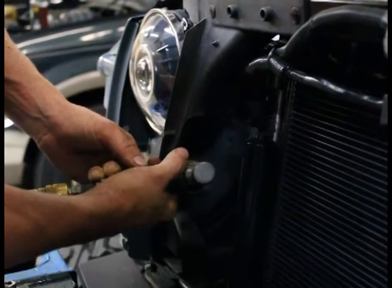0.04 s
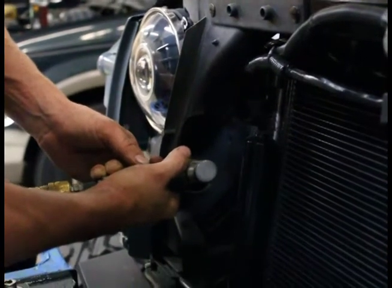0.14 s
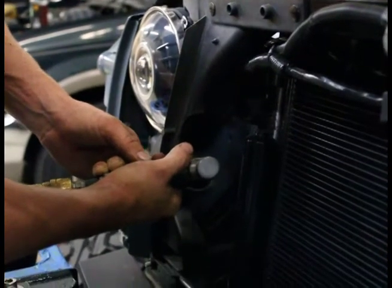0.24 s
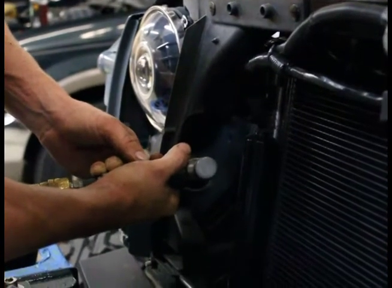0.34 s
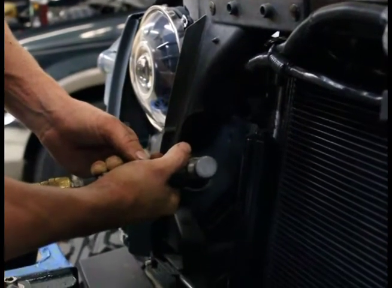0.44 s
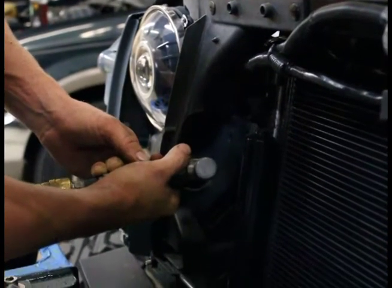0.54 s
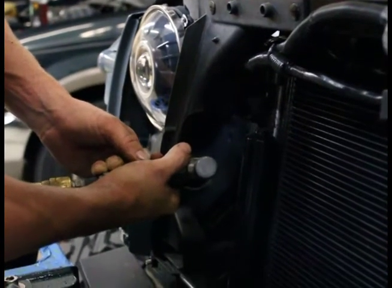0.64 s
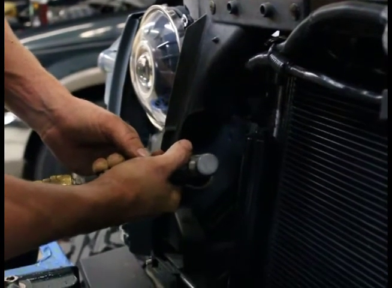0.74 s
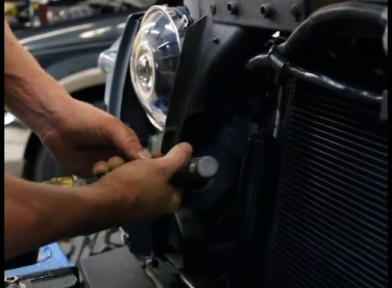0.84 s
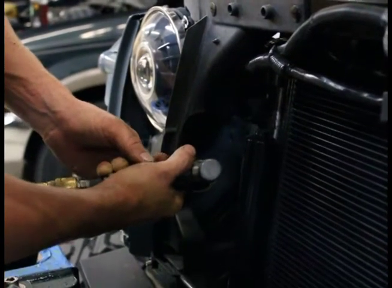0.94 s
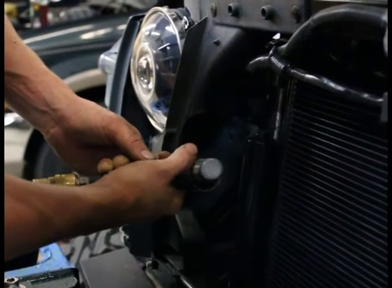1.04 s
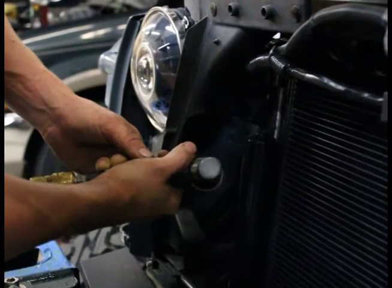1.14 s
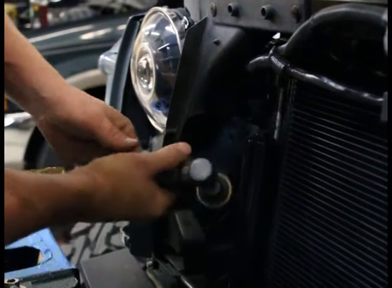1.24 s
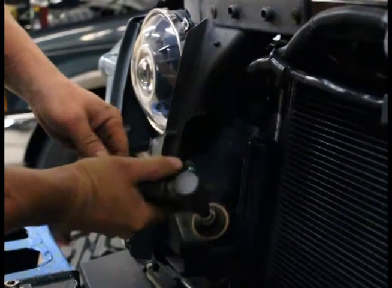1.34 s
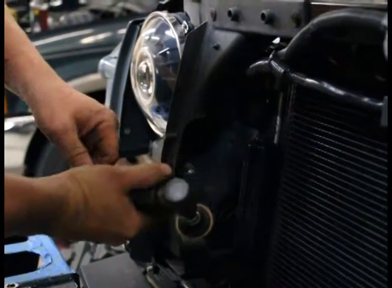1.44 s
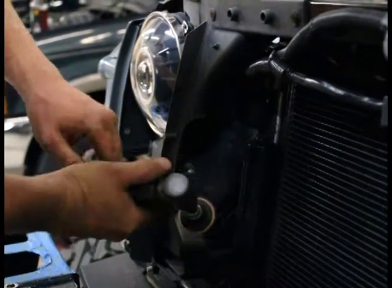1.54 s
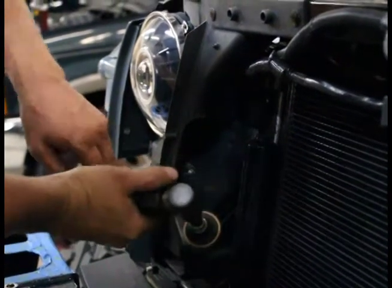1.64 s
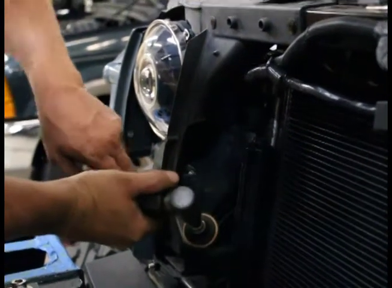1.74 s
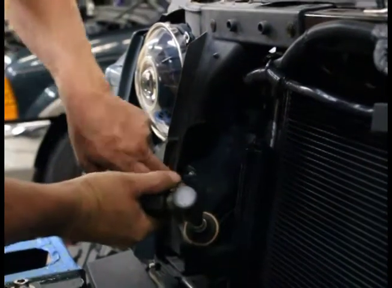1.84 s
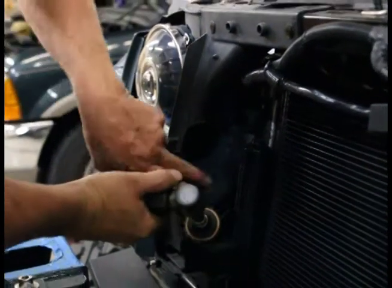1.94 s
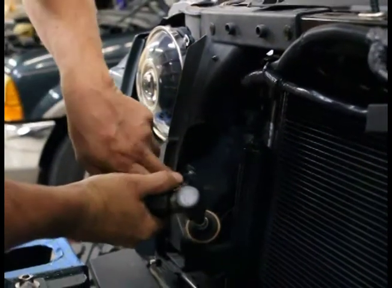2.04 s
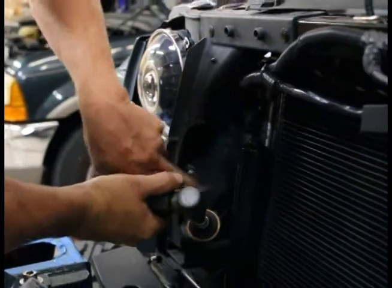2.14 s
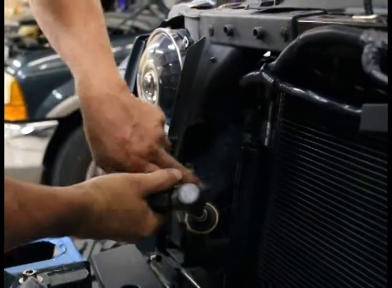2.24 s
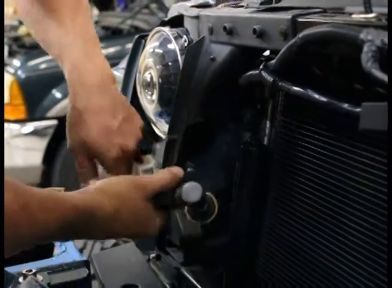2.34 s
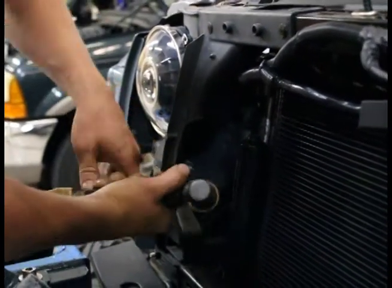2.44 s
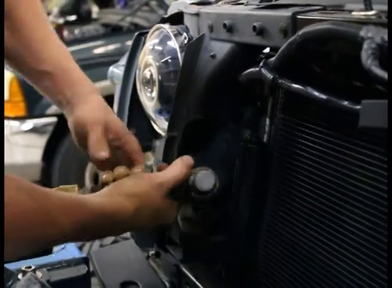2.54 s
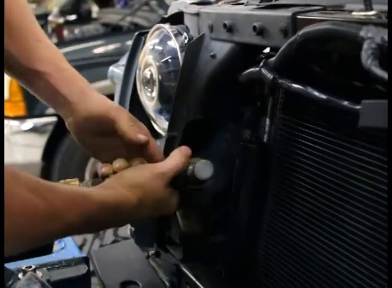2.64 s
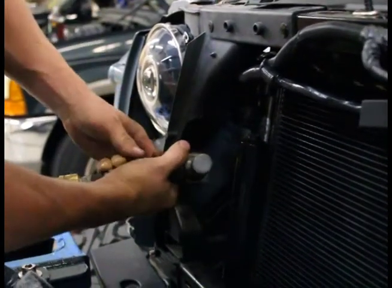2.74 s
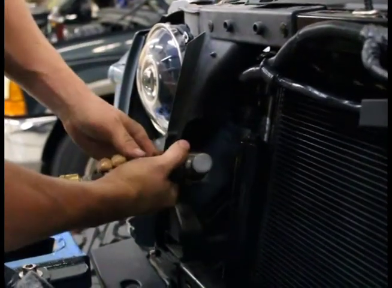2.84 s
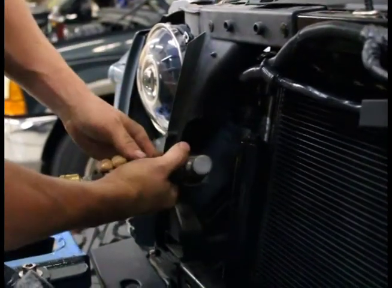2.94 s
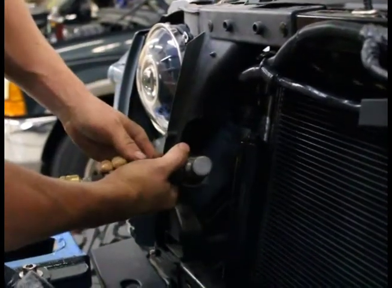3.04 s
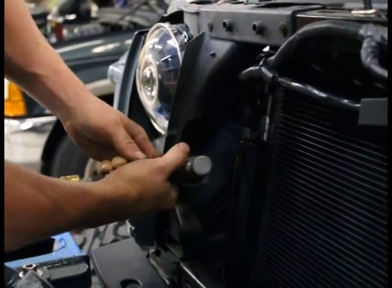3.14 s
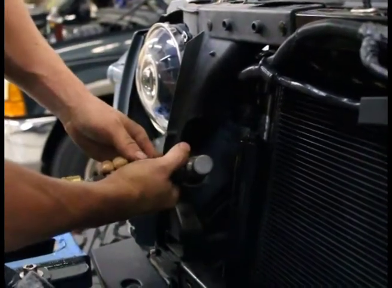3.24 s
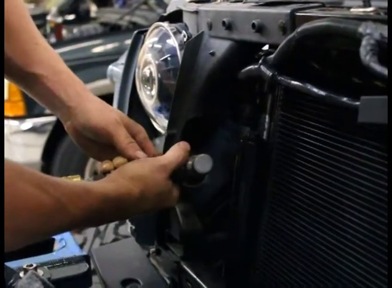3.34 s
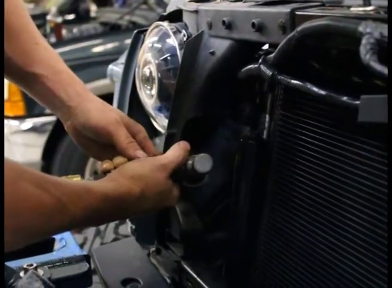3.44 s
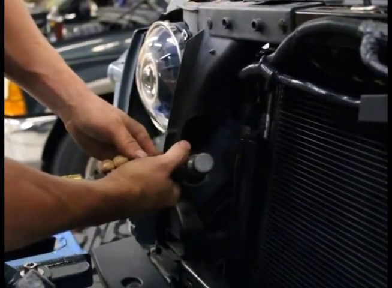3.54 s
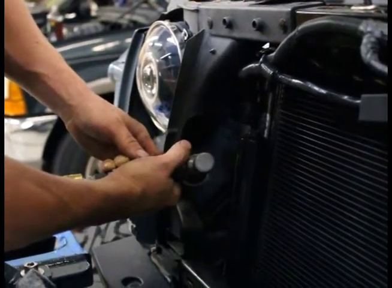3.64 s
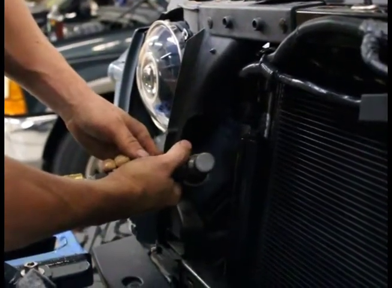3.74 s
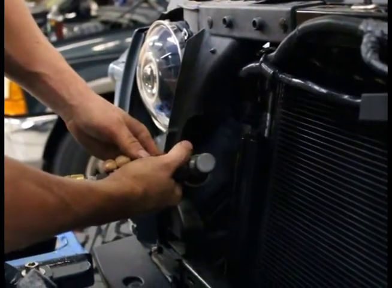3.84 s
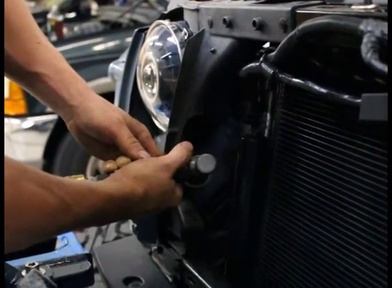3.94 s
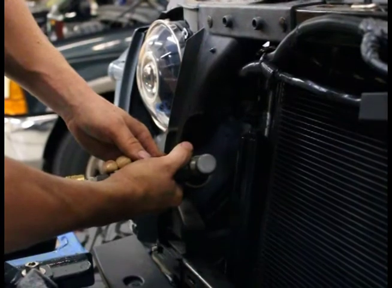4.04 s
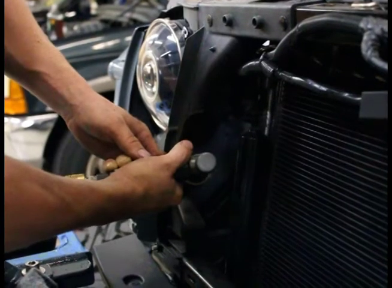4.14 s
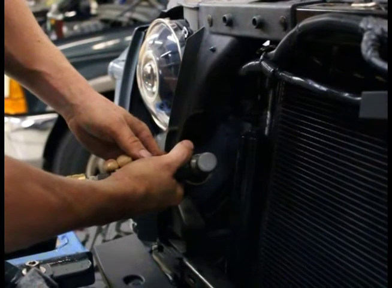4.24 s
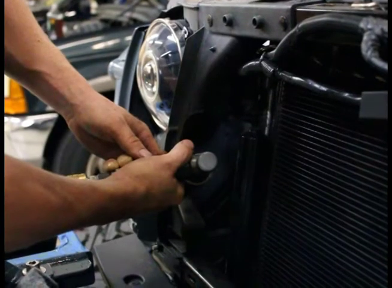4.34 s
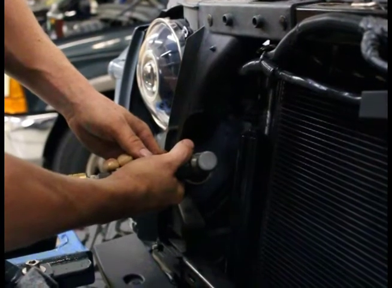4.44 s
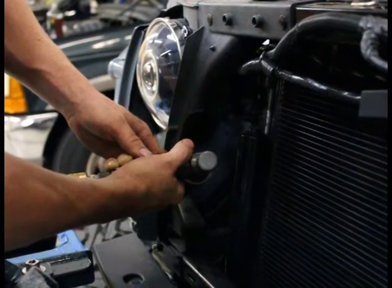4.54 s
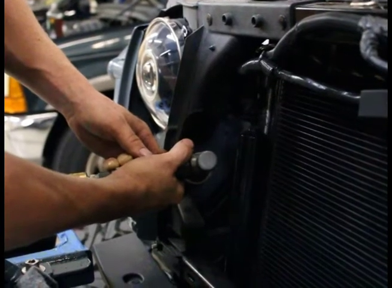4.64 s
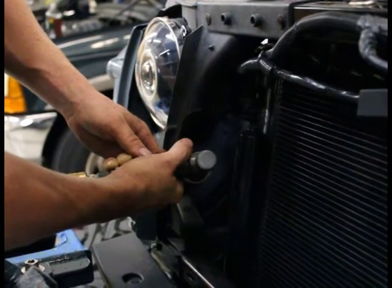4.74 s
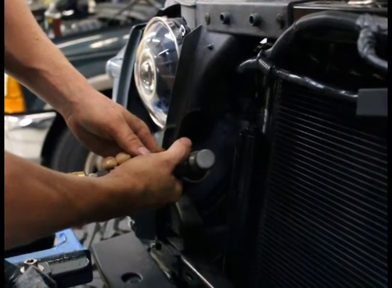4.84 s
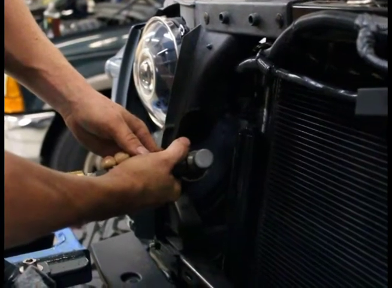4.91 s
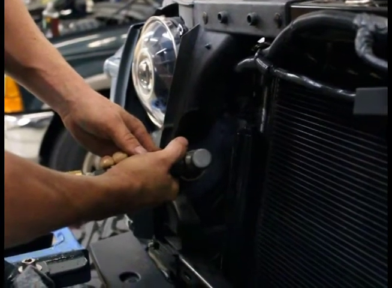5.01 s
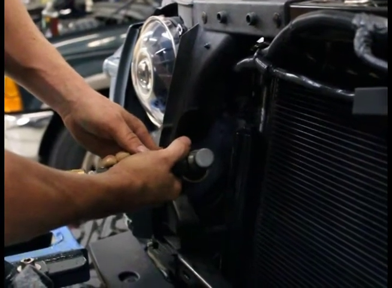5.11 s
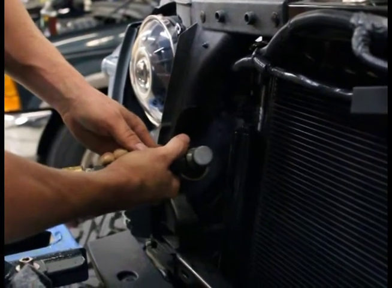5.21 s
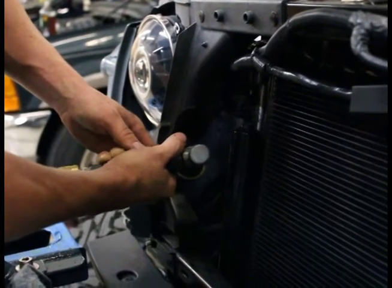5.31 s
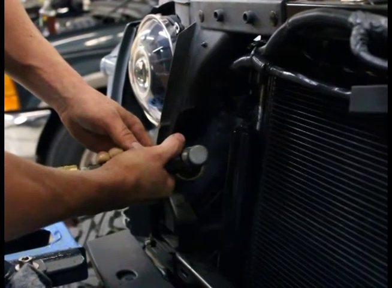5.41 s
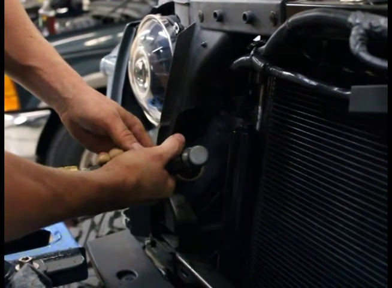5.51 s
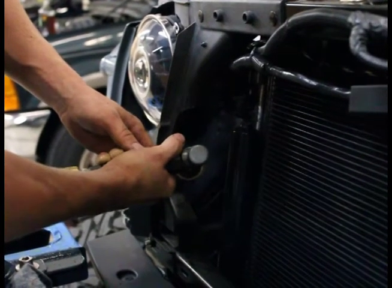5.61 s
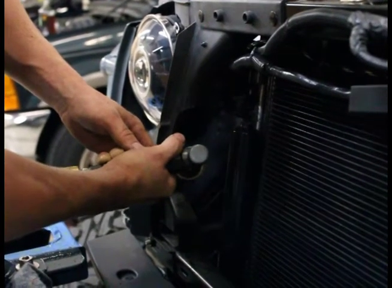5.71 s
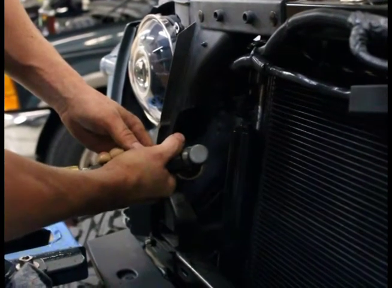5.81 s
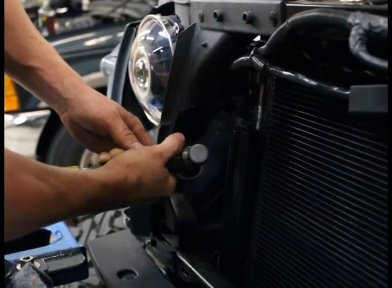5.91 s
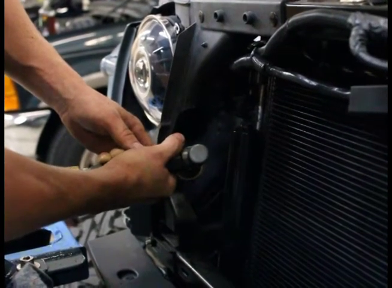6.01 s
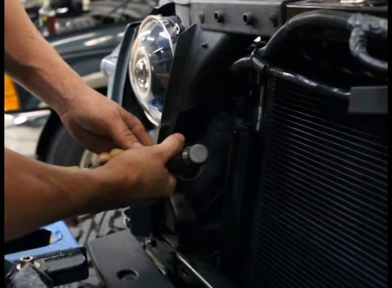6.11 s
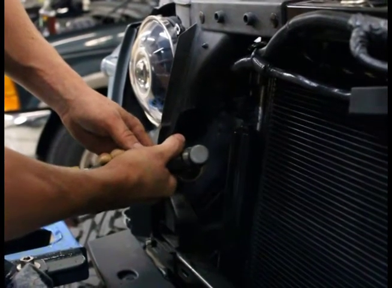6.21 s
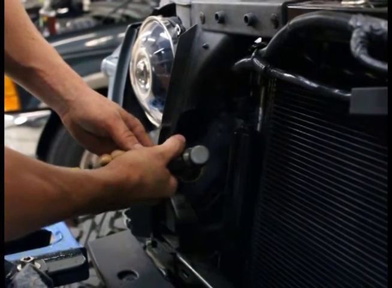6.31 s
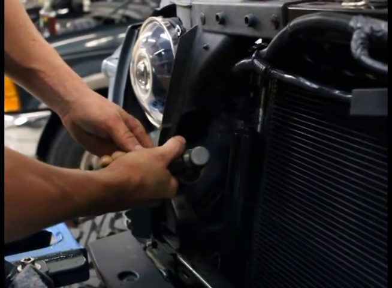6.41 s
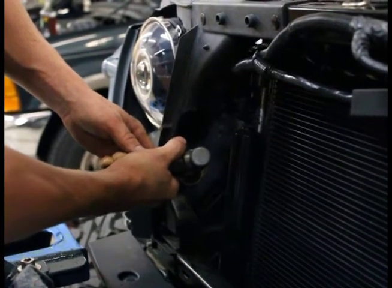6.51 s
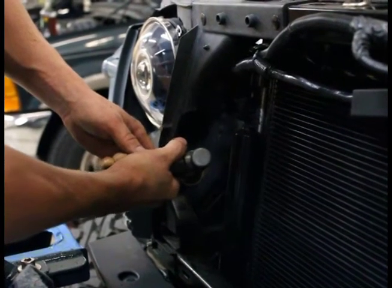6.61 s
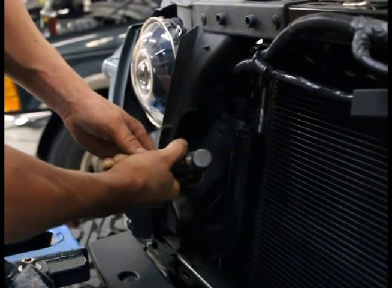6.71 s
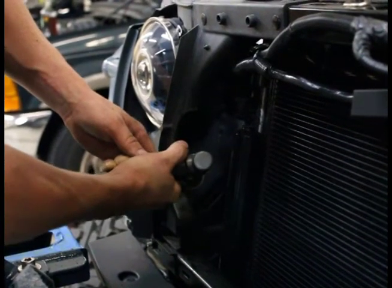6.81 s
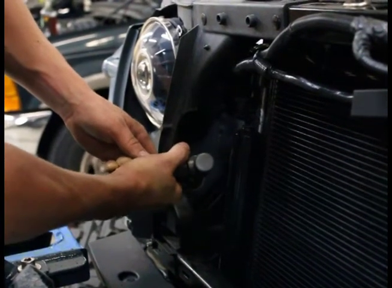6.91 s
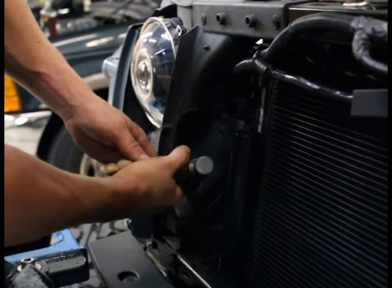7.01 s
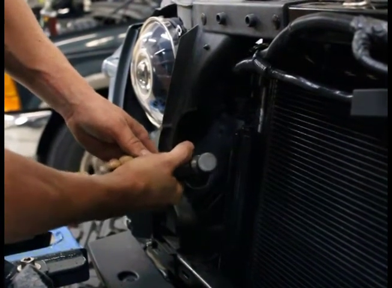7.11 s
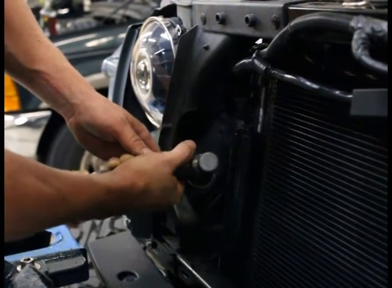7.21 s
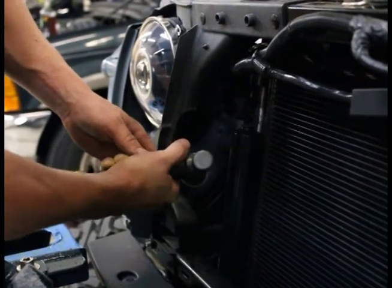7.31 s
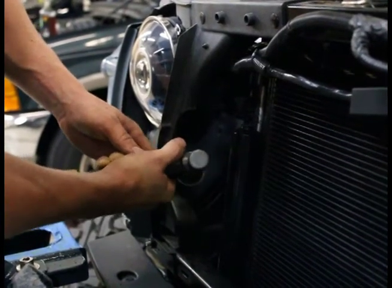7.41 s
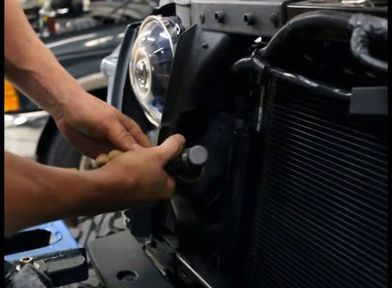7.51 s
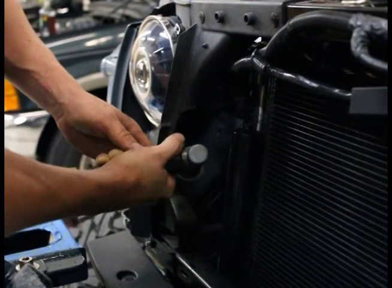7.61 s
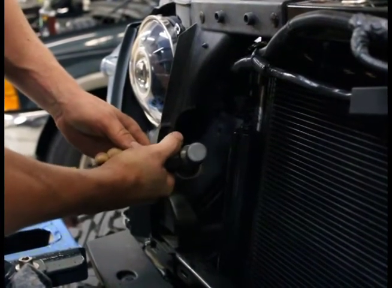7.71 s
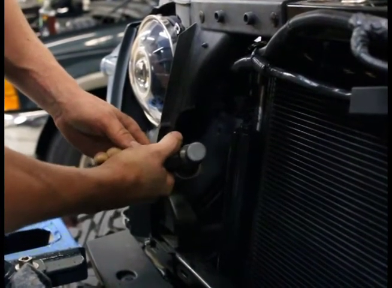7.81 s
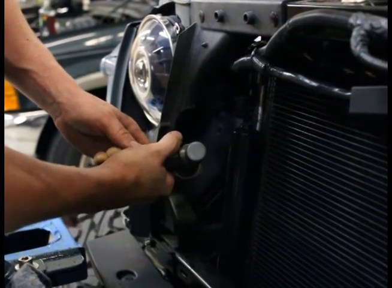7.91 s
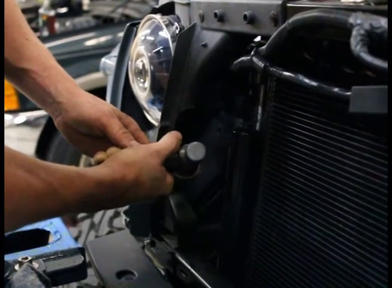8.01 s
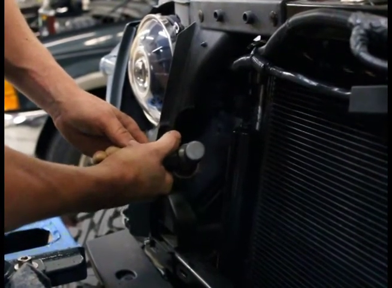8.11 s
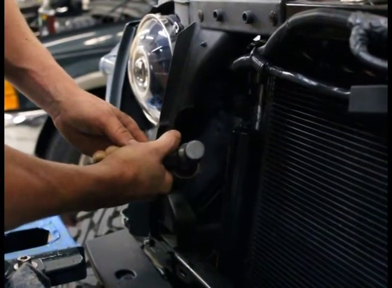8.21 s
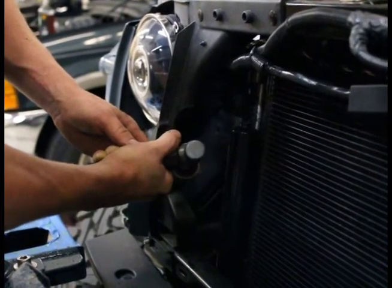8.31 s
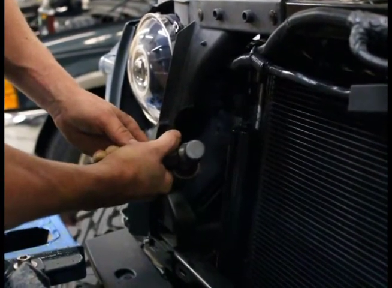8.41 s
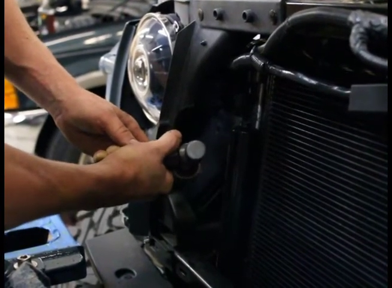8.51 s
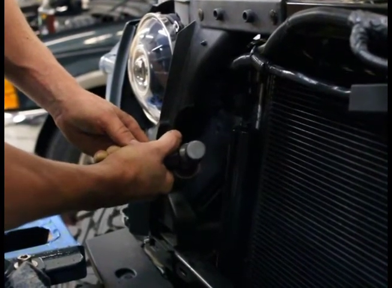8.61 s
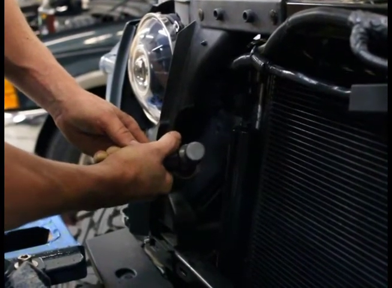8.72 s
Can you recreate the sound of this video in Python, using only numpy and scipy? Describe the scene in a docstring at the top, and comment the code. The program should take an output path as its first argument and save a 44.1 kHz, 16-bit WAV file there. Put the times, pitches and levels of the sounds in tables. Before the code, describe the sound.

Close pneumatic grinder screaming with bright air hiss and gritty rasp in a workshop, pausing around two seconds, then resuming with wavering pitch under load.

```python
"""A small air grinder sands a plastic panel on a car in a workshop; it coasts to a creep, spins up, and bogs down.
Its vanes chop the air into a whine (sines on the vane rate), the exhaust hisses (noise pulsed at that rate),
and the geared-down wheel rasps (rough noise) and briefly squeals (clicks ringing two resonances).
A compressor chugs behind it (strokes ringing resonances) and swells in the pause, as a gain control opens."""
import sys
import numpy as np
from scipy import signal
from scipy.fft import rfft, irfft
from scipy.io import wavfile
from scipy.ndimage import uniform_filter1d, minimum_filter1d

SR = 44100
rng = np.random.default_rng(int(sys.argv[2]) if len(sys.argv) > 2 else 0)


def bounce(signal):
    """Save signal as a 16-bit WAV file at the path given by the first command-line argument."""
    frames = np.transpose(np.atleast_2d(signal))
    limited = np.clip(frames, -1, 1)
    pcm = np.round(limited * 32767).astype(np.int16)
    wavfile.write(sys.argv[1], SR, pcm)


N = 386316
TIME = np.arange(N) / SR
FREQS = np.maximum(np.arange(N // 2 + 1) * SR / N, 1)
STARVED_BELOW_DB = -7.5  # air flow under which the motor is starved


def from_db(db):
    """Amplitude ratio of a level: twenty decibels per factor of ten."""
    return 10 ** (np.asarray(db) / 20)


def rms_one(x):
    """Normalise the mean power, so that a later gain sets the rms level."""
    return x / np.sqrt(np.mean(x ** 2) + 1e-20)


def in_time(*tables):
    """Linear interpolation: joins tables of (t, value, ..) rows into one curve per value column."""
    s, *columns = np.vstack(tables).T
    return [np.interp(TIME, s, column) for column in columns]


def coloured(x, spectrum):
    """Spectral shaping by (f/Hz, level/dB) points, interpolated over log frequency; rms 1."""
    hz, db = np.transpose(spectrum)
    gain = from_db(np.interp(np.log(FREQS), np.log(hz), db))
    return rms_one(irfft(rfft(x) * gain, N))


def white():
    """White noise: equal power at all frequencies."""
    return rng.standard_normal(N)


def drift(rate):
    """Slow random variation of rms 1: noise through two equal low-pass poles with corners at rate (Hz)."""
    step = 40  # samples between the points computed
    r = np.exp(-2 * np.pi * rate * step / SR)
    noise = rng.standard_normal(N // step + 2002)
    slow = signal.lfilter([1], [1, -2 * r, r * r], noise)[2000:]  # settled part
    return np.interp(np.arange(N) / step, np.arange(len(slow)), rms_one(slow))


def resonate(x, hz, width):
    """Two equal resonators in series: the ringing swells before it decays, with steep skirts; rms 1."""
    r = np.exp(-np.pi * width / SR)
    section = [1, 0, -1, 1, -2 * r * np.cos(2 * np.pi * hz / SR), r * r]
    return rms_one(signal.sosfilt([section, section], x))


def ticks(turns):
    """Impulse train: one click per full turn, shared between the two nearest samples."""
    at = np.flatnonzero(np.diff(np.floor(turns)) > 0)
    late = (np.ceil(turns[at]) - turns[at]) / (turns[at + 1] - turns[at])
    clicks = np.zeros(N)
    clicks[at], clicks[at + 1] = 1 - late, late
    return clicks


def bump(x, centre, width):
    """Gaussian bell of height 1, fallen to 1/e at one width from its centre."""
    return np.exp(-((x - centre) / width) ** 2)


def workshop(x, t60):
    """Diffuse reverberation: convolution with exponentially decaying noise of unit energy."""
    t = TIME[:SR // 2]
    tail = rng.standard_normal(len(t)) * from_db(-60 * t / t60)
    return signal.fftconvolve(x, tail / np.linalg.norm(tail))[:N]


def shop_murk():
    """Steady broadband background: stationary noise with the spectrum of the shop."""
    # background spectrum: f/Hz, level/dB
    shop_spectrum = [(30, -44.5), (70, -40), (110, -20.5), (200, -13), (400, 5.5), (600, -3), (1000, -1),
                     (1400, -1.5), (2400, -4.5), (3500, -10), (5200, -19), (10000, -39)]
    return from_db(-38) * coloured(white(), shop_spectrum)


def compressor(unevenness_db=.35, clatter=.45):
    """Periodic excitation of resonances: piston strokes ring pipes and tank, beside tones and a noisy casing."""
    stroke_hz = 24.338
    # resonances of pipes and tank: f/Hz, width/Hz, rms level/dB, delay/s
    pump_modes = [(138, 54, -52, 0.015), (229.5, 47, -47.5, 0.0017), (271.2, 20.5, -44.5, .036),
                  (355.4, 45, -44.5, .039), (408, 100, -38.5, .033)]
    # steady tones: f/Hz, rms level/dB
    pump_tones = [(48.6, -65.5), (97.3, -53.5), (803, -50)]
    # resonances of the casing: f/Hz, width/Hz, rms level/dB
    casing_modes = [(985, 100, -46), (1723, 150, -47.5), (2300, 230, -51.5)]
    turns = stroke_hz * TIME
    force = from_db(unevenness_db * drift(6.6))
    sound = np.zeros(N)
    for hz, width, db, delay in pump_modes:
        strokes = force * ticks(turns - stroke_hz * delay)
        sound += from_db(db) * resonate(strokes, hz, width)
    for hz, db in pump_tones:
        sound += from_db(db) * np.sqrt(2) * np.sin(2 * np.pi * hz * TIME)
    rattle = white() * (1 + clatter * np.cos(2 * np.pi * turns))
    for hz, width, db in casing_modes:
        sound += from_db(db) * resonate(rattle, hz, width)
    return sound


def gears(wheel_turns, gear_db, waver_db=5.0):
    """Harmonics of rotation: uneven tooth mesh puts tones on multiples of the wheel's turn rate."""
    # gear tones: multiple of the wheel's turn rate, level/dB re gear_db
    gear_tones = [(6, -4), (8, -3), (11, -4), (14, -3), (15, -2), (18, -2), (19, -5), (20, -1), (24, -3),
                  (29, -3), (30, -2)]
    tones = 0
    for k, db in gear_tones:
        tones = tones + from_db(db + waver_db * drift(4)) * np.sin(2 * np.pi * k * wheel_turns)
    return from_db(gear_db) * np.sqrt(2) * tones


def rattle_level(speed, driven, hush_db=31.0, edge_db=6.5):
    """Backlash: teeth knock most while coasting or picking up, and fall quiet under full drive."""
    peak_db, loudest_hz = -32.0, 560  # the level falls by edge_db one octave from this vane rate
    return peak_db - edge_db * np.log2(speed / loudest_hz) ** 2 - hush_db * driven ** 2


def backlash(wheel_turns, rattle_db, uneven_db=4.0):
    """Impact excitation: unloaded teeth knock once a turn, with varying force, and ring the gear head."""
    knocks = ticks(wheel_turns) * from_db(uneven_db * np.clip(drift(150), -2, 2))
    lower = from_db(-0.5) * resonate(knocks, hz=1970, width=500)
    upper = resonate(knocks, hz=3320, width=460)
    return from_db(rattle_db) * (lower + upper)


def squeal_level():
    """Friction-driven growth: the squeal swells, holds, and breaks off as the wheel is lifted."""
    start_s, hold_s, held_db = 6.94, 0.084, -21
    rise_db_per_s, fall_db_per_s = 73, 698
    before = np.maximum(start_s - TIME, 0)
    after = np.maximum(TIME - start_s - hold_s, 0)
    return held_db - rise_db_per_s * before - fall_db_per_s * after


def wheel(wheel_turns, rasp_db, squeal_db, grain_db=1.0, wobble=0.15):
    """Abrasion and friction: grit tears noisily, harder once a turn; the catching rim rings as a squeal."""
    # spectrum of the rasp: f/Hz, level/dB
    rasp_spectrum = [(100, -46), (800, -19), (2500, -21.5), (3600, 0.5), (4400, 2), (5300, -4), (6500, -3),
                     (10000, -13)]
    grains = from_db(grain_db * np.minimum(rng.exponential(1, N), 3))
    grit = white() * grains * (1 + wobble * np.sin(2 * np.pi * wheel_turns))
    rasp = from_db(rasp_db + 0.71 * drift(9.9)) * coloured(grit, rasp_spectrum)
    catches = ticks(wheel_turns)
    squeal = resonate(catches, hz=5400, width=600) + from_db(-11) * resonate(catches, hz=7050, width=700)
    return rasp + from_db(squeal_db + 2.0 * drift(25)) * squeal


def exhaust(turns, rush_db, jet_db, pulsing=0.28):
    """Turbulent jet noise, amplitude-modulated at the vane rate: a broad rush with a bright hiss on top."""
    # spectrum of the rush: f/Hz, level/dB
    rush_spectrum = [(70, -48), (170, -15.5), (300, -10), (650, -1.5), (900, -5.5), (1300, 0), (1600, -0.5),
                     (1950, 4), (2300, -2.5), (2700, 3.5), (3300, -1), (5000, -10.5), (10000, -29)]
    # spectrum of the jet hiss: f/Hz, level/dB
    jet_spectrum = [(100, -60), (1000, -31), (4000, -12.5), (5600, -3), (6500, -1), (7500, 4.5),
                    (8500, 2.5), (9500, 2), (10200, -13)]
    puffs = 1 + pulsing * np.sin(2 * np.pi * turns)
    rush = from_db(rush_db + 6.5 + 0.19 * drift(13)) * coloured(white() * puffs, rush_spectrum)
    jet = from_db(jet_db + .5 * drift(19)) * coloured(white() * puffs, jet_spectrum)
    return rush + jet


def slow_puffs(turns, speed, puff_db, burr_db=8.5, merge_hz=900, uneven_db=4.5):
    """Separate pulses at low vane rates: a rough burr, and air spitting through the ports' resonances."""
    apart = np.clip(2 * (1 - speed / merge_hz), 0, 1)
    valve_open = np.clip((puff_db + 50) / 8, 0, 1)
    turning = np.clip(speed / 200 - .6, 0, 1)
    puffs = ticks(turns) * from_db(uneven_db * drift(110))
    burr_spectrum = [(60, -43.5), (200, -14), (700, 1.5), (1200, -2), (1700, -6), (4000, -25), (10000, -33)]
    burr = turning * from_db(puff_db + burr_db) * coloured(puffs, burr_spectrum)
    gated = white() * (1 + 0.3 * np.cos(2 * np.pi * turns))
    ports = resonate(gated, hz=2630, width=380) + resonate(gated, hz=3650, width=600)
    spit = valve_open * from_db(puff_db + 2.0) * ports
    return apart * (burr + spit)


def slow_harmonics(turns, speed, bark_db, centre_hz=430, spread_octaves=1.0, flutter_db=3.0):
    """Harmonics of sharp pulses: higher partials sweep along with the whine as the motor runs down or up."""
    # harmonics: multiple of the vane rate, peak level/dB re bark_db
    harmonics = [(3, 2), (4, -4), (5, -5)]
    tones = 0
    for k, db in harmonics:
        tones = tones + from_db(db + flutter_db * drift(40)) * np.sin(2 * np.pi * k * turns)
    return from_db(bark_db) * bump(np.log2(speed / centre_hz), 0, spread_octaves) * tones


def overtones(turns, speed, rush_db, whistle_db, waver_db=2.5, from_hz=1050):
    """Rotor asymmetry: unequal vanes and bearings add wavering tones near full speed, beside a thin whistle."""
    # rotor and bearing tones: multiple of the vane rate, level/dB re 1 dB below rush_db
    rotor_tones = [(.25, -19.5), (.5, -9), (.75, -22.5), (1.25, -8.5), (1.53, -8.5), (3, -15), (4, -13.5),
                   (4.249, -23), (6, -14)]
    spun_up = np.clip((speed - from_hz) / 200, 0, 1)
    tones = 0
    for k, db in rotor_tones:
        tones = tones + from_db(db + waver_db * drift(3.8)) * np.sin(2 * np.pi * k * turns)
    whistle = from_db(whistle_db + 2.0 * drift(28)) * np.sin(10 * np.pi * turns)  # fifth harmonic
    return np.sqrt(2) * (spun_up * from_db(rush_db - 1.0) * tones + whistle)


def standing_waves(hz):
    """Interference between tool and panel lifts or swallows a tone gliding through; gain in dB."""
    # standing waves: f/Hz, half-width to 1/e /Hz, gain/dB
    wave_table = [(630, 42, 2.5), (990, 71, -7.5), (1154, 62, 4.5), (1382, 25, 3.5), (1499.5, 51, -15.5),
                  (1656, 20, -9), (2146, 170, -9.5), (2503, 94, -3.5), (2591, 27, 5.5), (2952, 51, -11),
                  (3370, 49, 0.5)]
    return sum(db * bump(hz, centre, width) for centre, width, db in wave_table)


def vane_levels(speed, starved_db, sway_db=1.5):
    """Source strength and interference: air and pitch set the whine and octave levels, with a slight sway."""
    # vane tones as the hands turn the tool: t/s, whine level/dB, octave level/dB, ahead of the terms below
    tone_levels = [(0, -22.5, -24.5), (1.0, -26.5, -23.5), (1.42, -19, -27), (1.55, -30, -29),
                   (2.72, -19.5, -23), (3.5, -24, -24.5), (4.1, -24, -23.5), (4.8, -22.5, -23.5),
                   (5.3, -22.5, -21.5), (5.8, -22.5, -24), (6.3, -23.5, -25.5), (7.2, -23, -31),
                   (7.8, -20.5, -29), (8.6, -21.5, -20.5)]
    weak_below_hz, weak_db_per_octave = 420, 26.0
    weak_db = weak_db_per_octave * np.minimum(np.log2(speed / weak_below_hz), 0)
    whine_db, octave_db = in_time(tone_levels)
    # share of the air's starvation that each tone follows
    whine_db = whine_db + 0.65 * starved_db + standing_waves(speed)
    octave_db = octave_db + 0.73 * starved_db + standing_waves(2 * speed)
    return [db + weak_db + sway_db * drift(8.7) for db in (whine_db, octave_db)]


def whine(turns, whine_db, octave_db, flutter_db=0.5):
    """Siren principle: each vane lets out a puff of air, giving a piercing tone and its octave."""
    first = from_db(whine_db + flutter_db * drift(30)) * np.sin(2 * np.pi * turns)
    second = from_db(octave_db + flutter_db * drift(30)) * np.sin(4 * np.pi * turns)
    return np.sqrt(2) * (first + second)


def controls():
    """Rotor dynamics: speed and air flow give starvation, drive, load on the wheel and the kick of speeding up."""
    # light first pass: t/s, vane rate f/Hz
    first_run = [(0.0, 1408), (0.03, 1508), (0.392, 1724), (0.514, 1624), (0.664, 1586), (0.83, 1722),
                 (0.958, 1603), (1.044, 1676), (1.1, 1550)]
    # coasting, creeping and spinning up again: t/s, vane rate f/Hz
    pause = [(1.2, 1240), (1.278, 1112), (1.412, 657), (1.5, 436), (1.6, 299.5), (1.75, 160), (2.5, 119.5),
             (2.58, 215), (2.719, 364), (2.75, 528.3), (2.78, 786.5), (2.81, 980)]
    # long pass that ends bogged down: t/s, vane rate f/Hz
    long_pass = [(2.84, 1081), (3.07, 1386), (3.21, 1499), (3.59, 1399), (3.78, 1443), (4.15, 1356),
                 (4.25, 1435), (4.35, 1471), (4.74, 1361), (4.88, 1378), (5.25, 1669), (5.42, 1637),
                 (5.59, 1438), (5.69, 1437), (5.96, 1311), (6.24, 1308), (6.93, 1165), (7.05, 1189)]
    # lifted off, eased and pressed on again: t/s, vane rate f/Hz
    last_pass = [(7.09, 1294), (7.148, 1570), (7.222, 1635), (7.33, 1213), (7.368, 1208), (7.448, 1417),
                 (7.584, 1589), (7.818, 1679), (8.06, 1521)]
    # leaning on the wheel once more: t/s, vane rate f/Hz
    last_press = [(8.27, 1438), (8.454, 1374), (8.596, 1283), (8.68, 1268), (8.75, 1292)]
    # trigger: t/s, air flow level/dB re nominal full flow
    throttle = [(0, 1.5), (1.03, 0), (1.36, -18), (1.55, -26), (1.8, -32), (2.465, -35), (2.48, -25.5),
                (2.68, -21), (2.75, -5.5), (2.82, -6), (2.95, -2.5), (4.9, 0.5), (7.2, 0), (7.28, -8),
                (7.35, -7.5), (7.43, -0.5), (8.2, 2)]
    vane_hz, = in_time(first_run, pause, long_pass, last_pass, last_press)
    flow_db, = in_time(throttle)
    # the rotor's inertia rounds off changes of speed; the wheel's grip makes it waver
    speed = uniform_filter1d(vane_hz, size=900) * (1 + 0.0035 * drift(14))
    starved_db = np.minimum(flow_db - STARVED_BELOW_DB, 0)
    driven = np.minimum(from_db(flow_db) ** 2, 1)
    # a driven motor that runs slow is taken to be pressed on the panel
    free_hz, bogged_hz = 1590, 1166
    load = driven * np.clip((free_hz - speed) / (free_hz - bogged_hz), 0, 1)
    full_kick_hz_per_s = 4000
    hz_per_s = np.gradient(uniform_filter1d(vane_hz, size=2600)) * SR
    kick = np.clip(hz_per_s / full_kick_hz_per_s, 0, 1)
    return speed, flow_db, starved_db, driven, load, kick


def scene():
    """Superposition of sources: a close grinder led by speed and trigger, with compressor and shop behind it."""
    speed, flow_db, starved_db, driven, load, kick = controls()
    turns = np.cumsum(speed) / SR
    wheel_turns = turns / 5  # reduction gear

    # the jet follows the flow in full; rush and rasp follow it weakly until the motor is starved
    fed_db = np.maximum(flow_db, STARVED_BELOW_DB)
    rush_db = -30.0 + 0.72 * starved_db + 0.38 * fed_db
    rasp_db = -24.5 + 1.1 * starved_db + 1.5 * load + 0.28 * fed_db
    jet_db = -21.8 + flow_db
    # the whistle is loudest where the fifth harmonic meets a resonance of the ports
    whistle_db = -39.5 + flow_db + 10.5 * bump(5 * speed, 7050, 300)
    # jerked up to speed, the puffs bark and spit and the teeth knock harder
    bark_db = rush_db + 9.0 * kick
    puff_db = rush_db + 3.0 * kick
    # air flow makes the gearbox ring harder
    rattle_db = rattle_level(speed, driven) + .15 * flow_db + 10.0 * kick
    gear_db = -54 + 16 * load + 2 * starved_db

    tones = whine(turns, *vane_levels(speed, starved_db))
    tones = tones + overtones(turns, speed, rush_db, whistle_db)
    tones = tones + slow_harmonics(turns, speed, bark_db)
    motor = tones + from_db(-18.0) * workshop(tones, t60=0.42)
    air = exhaust(turns, rush_db, jet_db) + slow_puffs(turns, speed, puff_db)
    gearbox = gears(wheel_turns, gear_db) + backlash(wheel_turns, rattle_db)
    sanding = wheel(wheel_turns, rasp_db, squeal_level())
    return np.tile(motor + air + sanding + gearbox + compressor() + shop_murk(), (2, 1))


def gain_control(x, most_db=11.0):
    """Dynamic compression: the gain drops promptly on loud sound, holds, and creeps back up."""
    target_db, squeeze, hold_s = -14.5, .7, .38  # squeeze: share of the distance to the target made up
    release_db_per_s = 10.0  # fall of the held level
    level_db = 10 * np.log10(uniform_filter1d(x[0] ** 2, size=1300) + 1e-12)
    hold = int(hold_s * SR / 2)
    # loudest level within the hold time just past
    recent_db = -minimum_filter1d(-level_db, 2 * hold + 1, origin=hold, mode="nearest")
    fall = release_db_per_s * TIME
    held_db = np.maximum.accumulate(recent_db + fall) - fall
    return x * from_db(np.minimum(squeeze * (target_db - held_db), most_db))


def record(dry, hiss_db=-59.0):
    """Band limitation: gain control, a narrow microphone band, faint electronic hiss, and the top cut."""
    band = signal.ellip(12, .1, 80, 10060, fs=SR, output="sos")
    narrow = signal.sosfilt(band, gain_control(dry))
    hiss_spectrum = [(1000, -44.0), (13000, 27)]
    hiss = from_db(hiss_db) * np.stack([coloured(white(), hiss_spectrum) for side in "LR"])
    top_cut = signal.ellip(10, .1, 80, 15800, fs=SR, output="sos")
    return signal.sosfilt(top_cut, narrow + hiss)


dry = scene()
out = record(dry)
bounce(out)
```